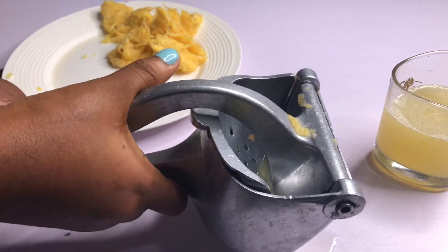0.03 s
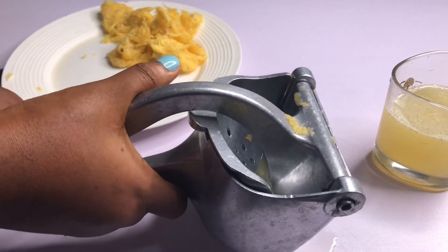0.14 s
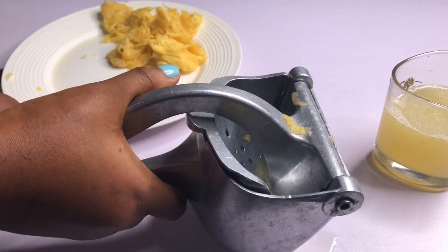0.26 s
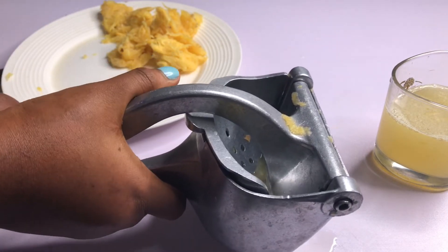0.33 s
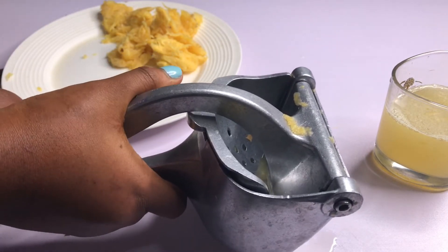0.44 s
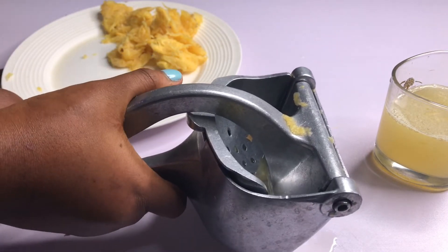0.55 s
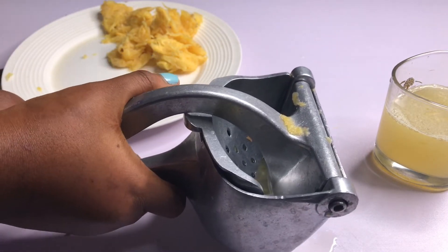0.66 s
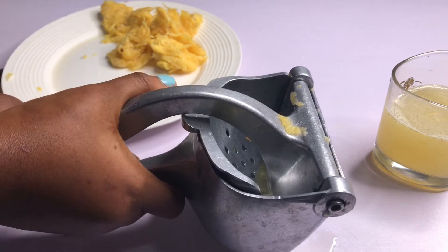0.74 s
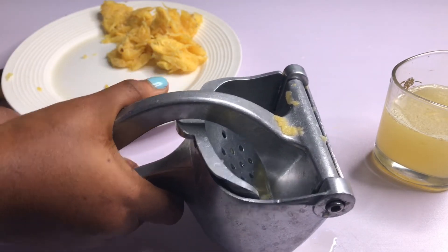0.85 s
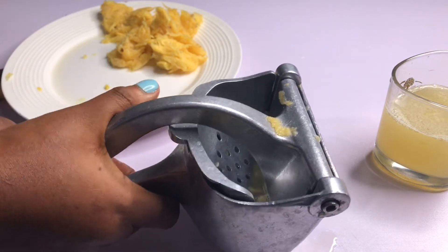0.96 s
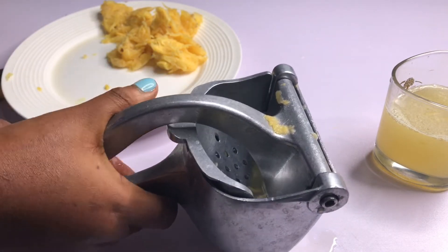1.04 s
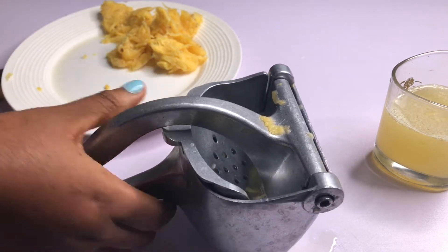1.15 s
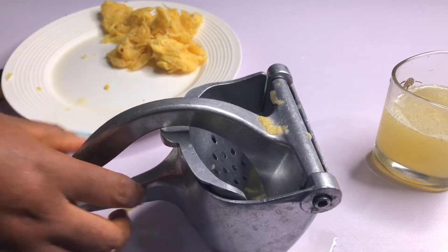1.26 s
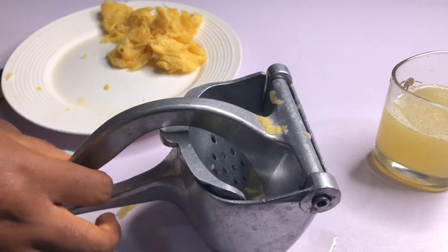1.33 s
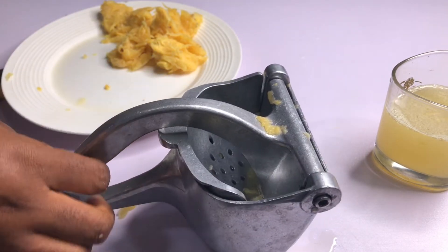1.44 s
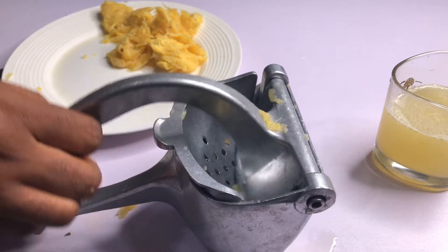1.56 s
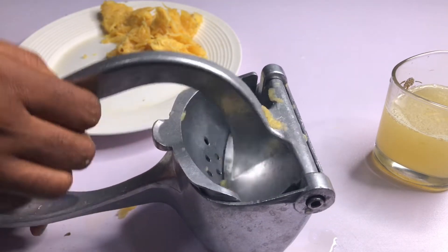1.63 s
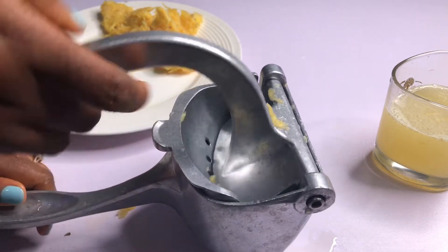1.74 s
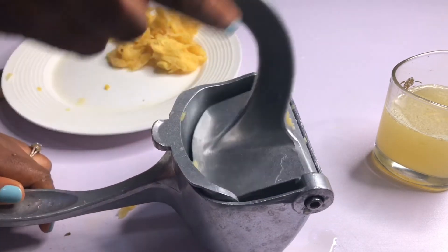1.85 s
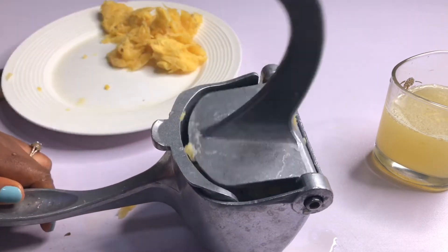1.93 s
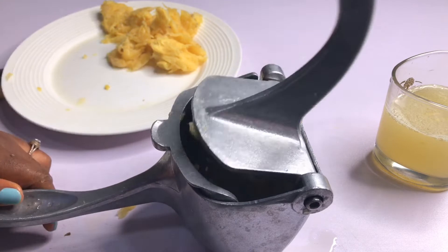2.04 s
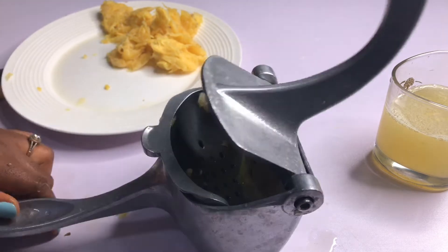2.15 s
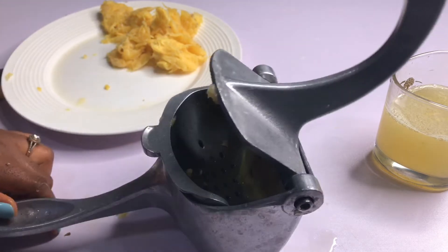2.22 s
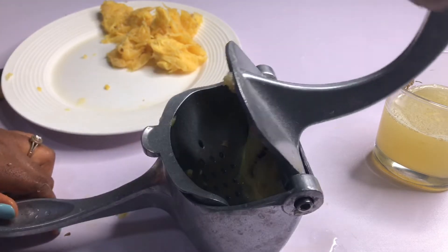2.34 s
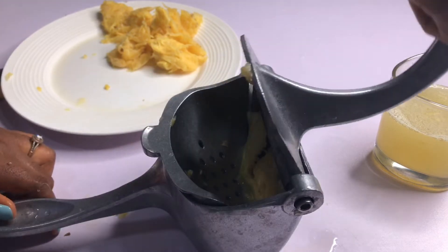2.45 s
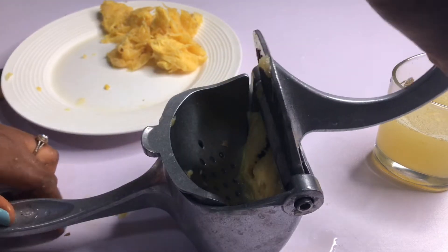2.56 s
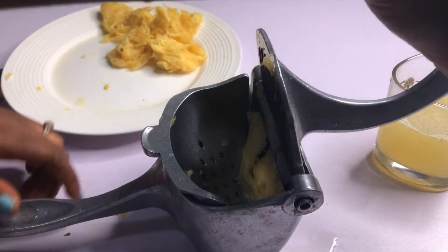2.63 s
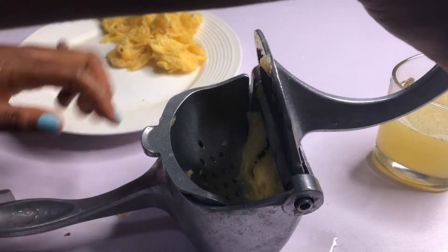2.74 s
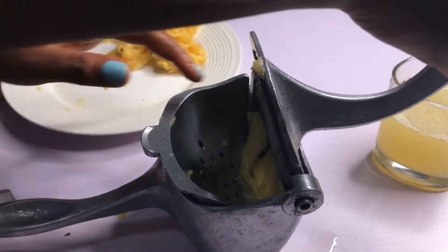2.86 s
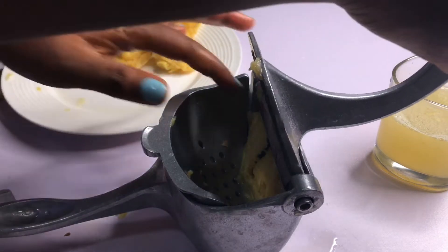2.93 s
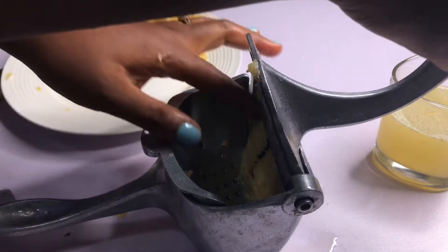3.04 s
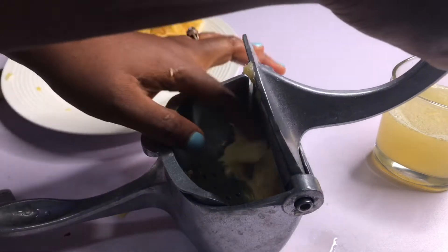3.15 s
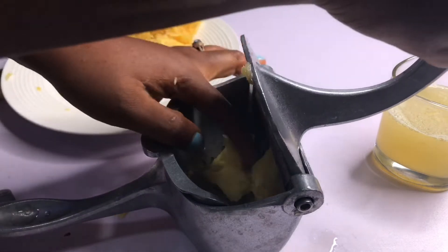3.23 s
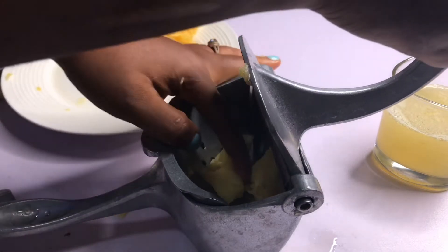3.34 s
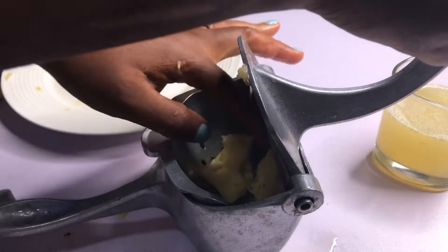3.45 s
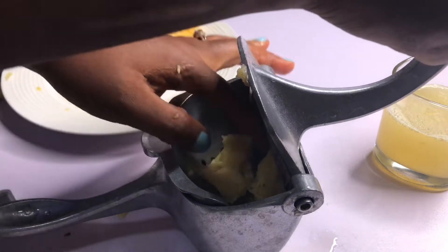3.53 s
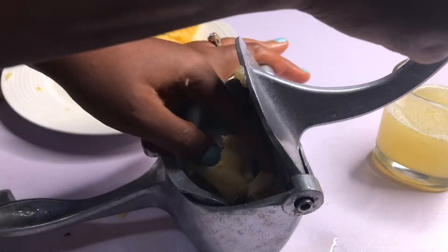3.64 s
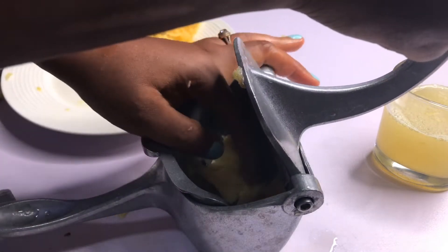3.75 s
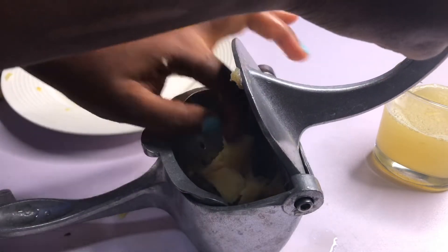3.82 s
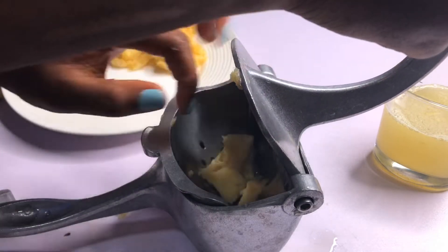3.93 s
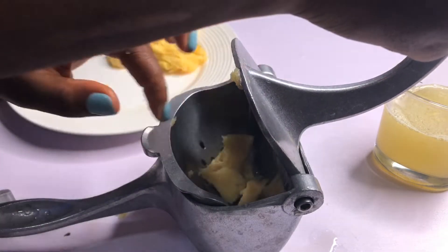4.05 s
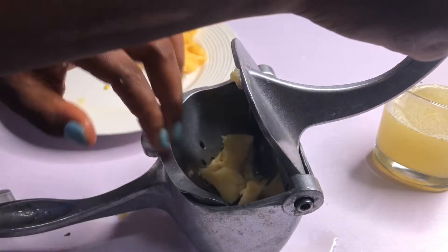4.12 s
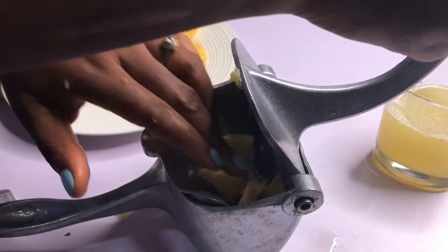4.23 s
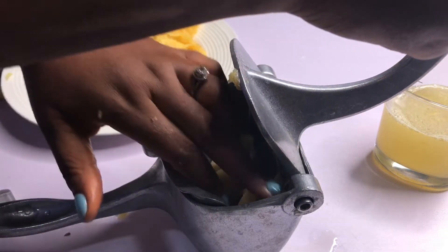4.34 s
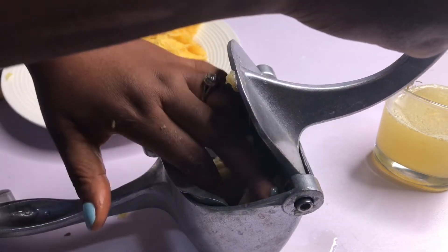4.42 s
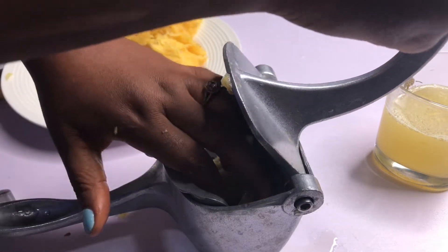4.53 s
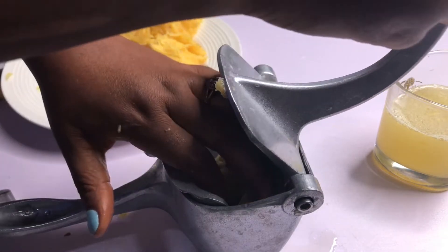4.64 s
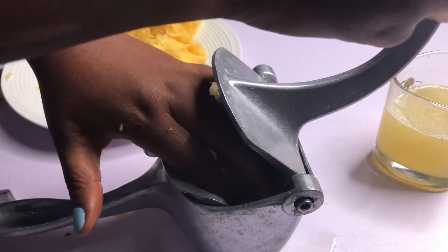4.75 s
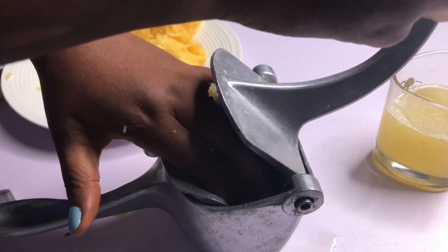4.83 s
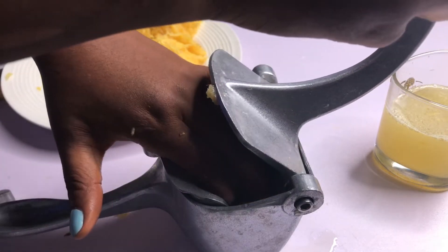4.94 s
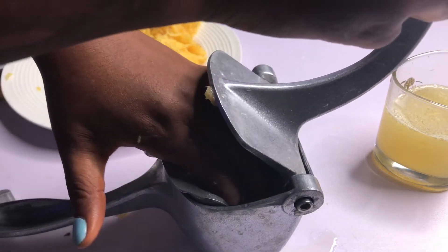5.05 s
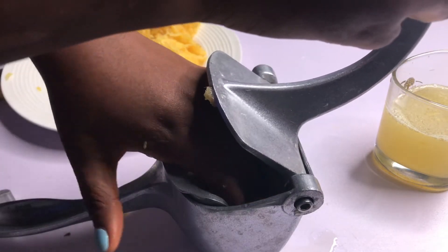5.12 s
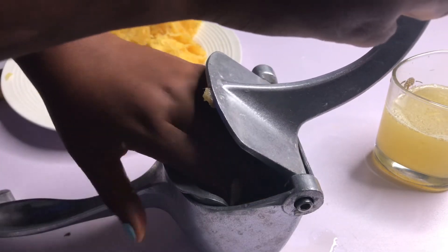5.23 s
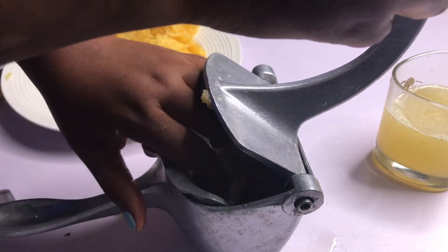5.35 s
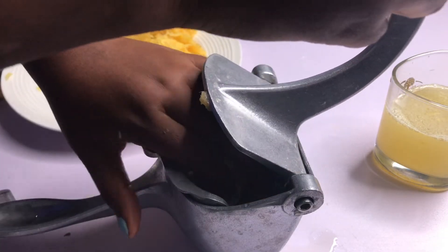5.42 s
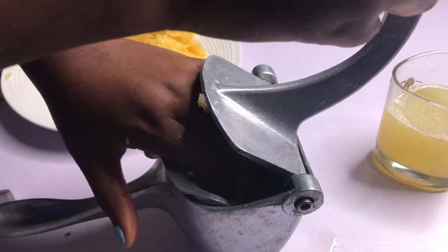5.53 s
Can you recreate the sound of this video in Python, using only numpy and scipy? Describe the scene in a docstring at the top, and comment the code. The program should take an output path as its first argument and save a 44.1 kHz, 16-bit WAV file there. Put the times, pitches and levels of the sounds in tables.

```python
"""A cast-metal lever juicer is worked on a kitchen table, close to the microphone.
The lever falls open with a loud clack and the foot knocks: each blow rings damped tones in frame, cup and table.
The loose hinge judders in short bursts of tiny slips as the lever lifts.
Juice squirts, wet peel clicks, fingers rub and pulp fizzes (gritty noise); a finger ring scrapes and squeaks on the cup.
A small room echoes everything softly, over quiet air noise and a faint hum of steady tones."""
import sys
import numpy as np
from scipy import signal
from scipy.fft import rfft, irfft
from scipy.io import wavfile

SR = 44100
rng = np.random.default_rng(int(sys.argv[2]) if len(sys.argv) > 2 else 0)


def file_out(sig):
    """Save sig as 16-bit WAV at sys.argv[1]."""
    # one column per channel
    cols = np.atleast_2d(sig).T
    # limit, then scale
    lim = np.clip(cols, -1, 1)
    pcm = np.round(lim * 32767).astype(np.int16)
    wavfile.write(sys.argv[1], SR, pcm)


N = 246078
T = np.arange(N) / SR
RING_T = T[:int(.8 * SR)]
SHORT_T = RING_T[:len(RING_T) // 10]
BLOW_SIZE = np.sqrt(.01 * SR)  # a blow's level is its energy spread over 10 ms


# the lever falls against its stop; hardness is the treble limit of a contact
CLACK_S, CLACK_HARD_HZ, CLACK_CHATTER_S = 2.137, 11800, .0083
CLACK_FRAME_DB, CLACK_TABLE_DB, CLACK_CUP_DB = -8.5, -13.5, -22.5
# steps from one contact to the next: time, levels, and factors on hardness and chatter length
REBOUND_S, REBOUND_DB, REBOUND_TABLE_DB = .0082, -3, -16.5
REBOUND_SOFTER, REBOUND_LOOSER = 0.56, 1.5


def clack(count=3):
    """The lever hits its stop and rebounds; each contact is weaker, softer and looser than the last."""
    contacts = []
    for k in range(count):
        contacts.append((
            CLACK_S + k * REBOUND_S,
            CLACK_HARD_HZ * REBOUND_SOFTER ** k,
            CLACK_FRAME_DB + k * REBOUND_DB,
            CLACK_TABLE_DB + k * REBOUND_TABLE_DB,
            CLACK_CUP_DB + k * REBOUND_DB,
            CLACK_CHATTER_S * REBOUND_LOOSER ** k))
    return blows(contacts, chatter_db=2.5, dense_db=-1, ring_db=-10, room_db=-5, foot_share=0.76, rock_db=-20)


# knocks of foot and fingers on the juicer; the table level is that of the push before it is softened
# columns: start_s, hardness_hz, frame_db, table_db, cup_db
KNOCKS = [(1.0409, 820, -17, -18.5, -58), (2.115, 3530, -51, -51, -70), (2.5137, 2720, -44, -47, -66),
          (2.8031, 1398, -56.5, -53, -74.5), (2.9706, 3000, -35, -39, -54),
          (3.117, 1800, -48.5, -45.5, -57), (3.2135, 2464, -50.5, -51.5, -66),
          (3.5768, 2166, -52.5, -50.5, -75), (3.8069, 870, -51, -49.5, -81),
          (3.9178, 990, -57.5, -45, -61.5), (3.947, 1198, -47, -44.5, -54), (4.3125, 724, -43, -38, -42.5),
          (5.0496, 3300, -49.5, -48, -52.5), (5.3147, 3000, -50, -48, -58), (5.3545, 2520, -57, -48, -62),
          (5.474, 6040, -45.5, -43.5, -39)]
KNOCK_CHATTER_S = 0.0051
# the first touch: how much earlier, level relative to the frame, fade time
TICK_LEAD_S, TICK_DB, TICK_S = 0.0016, -20.5, .0006


def knocks(tick_hz=11000):
    """A bright tick of noise at first touch, then the blow itself."""
    ticks = np.zeros(N)
    for start_s, _, frame_db, _, _ in KNOCKS:
        tick = unit(grit(len(RING_T), 3) * np.exp(-RING_T / TICK_S))
        add(ticks, start_s - TICK_LEAD_S, BLOW_SIZE * undb(frame_db + TICK_DB) * tick)
    ticks = through(soften(ticks, tick_hz), colour(CASTING_COLOUR))
    contacts = [(*knock, KNOCK_CHATTER_S) for knock in KNOCKS]
    body = blows(contacts, chatter_db=3.5, dense_db=0, ring_db=-11.5, room_db=-6.0, foot_share=1.1, rock_db=-7.5)
    return body + kitchen(ticks, wet_db=-8)


# ringing tones of the table, the cast frame and the strainer cup, levels relative within each table
# columns: pitch_hz, level_db, decay_s (time to fall by 60 dB)
TABLE_TONES = [(91.5, 2.5, 0.32), (112.5, -2.5, 0.21), (124, -6.5, 0.041), (183, 1, 0.53), (199.5, -4, .26),
               (218.5, -9, .26), (293.6, 4, 0.33), (329, -0.5, 0.17), (434, -6.5, .26), (425, -5, 0.28),
               (510, -16.5, 0.27), (588, 0, 0.28), (632.6, -10, 0.67), (733, -2, .26), (797, -10, 0.075),
               (918, -6.5, .17)]
FRAME_TONES = [(842, 4, .33), (950, -2, .35), (1042, -4, .24), (1152, -5, .2), (1427, -2, .18),
               (1504, -2, .18), (1663, -5, .2), (1773, -3, .18), (1858, 2, .18), (2028, -3, .24),
               (2500, -6, .22), (2670, -2, .12), (2826, -6, .3), (3505, -5, .16), (3960, 0, .13)]
CUP_TONES = [(1300, -7, .06), (1380, -6, .06), (2500, -13, .25), (2970, -8, .06), (4400, -7, .06),
             (4465, -13, .18), (5350, 2, .1), (5385, -8, .26), (6670, -7, .09), (6745, -12, .3),
             (10780, -22, .18), (11600, -20, .12)]
# tone colour of the casting when struck; columns: pitch_hz, relative level_db
CASTING_COLOUR = [(60, -23), (150, -0.5), (300, 0.5), (480, -2.5), (700, 1), (1300, 0.5), (2000, -1),
                  (4000, -4.5), (5000, -9), (8000, -11.5), (11000, -18.5), (16000, -14)]
# the juicer rocks: its second foot meets the table this much later
ROCK_S = .0022


def blows(contacts, chatter_db, dense_db, ring_db, room_db, foot_share, rock_db,
          dense_t60=.081, room_build_s=0.0037, lowest_hz=60):
    """Each blow chatters briefly in the loose joints, rings frame, cup and table, and echoes in the kitchen."""
    out, table = np.zeros((2, N))
    t = RING_T
    casting, frame, cup = colour(CASTING_COLOUR), modes(FRAME_TONES), modes(CUP_TONES)
    push = 1. * (t == 0)
    for start_s, hard_hz, frame_db, table_db, cup_db, chatter_s in contacts:
        chatter = undb(chatter_db) * unit(grit(len(t), 2.5) * np.exp(-t / chatter_s))
        # the casting's many short modes blur into a noisy crash
        dense_fade = np.exp(-np.log(1000) * t / dense_t60)
        dense = undb(dense_db) * unit(rng.standard_normal(len(t)) * dense_fade)
        room = undb(room_db) * tail(KITCHEN_DECAY, room_build_s)
        crash = unit(through(push + chatter + dense + room, casting))
        crash = crash + undb(ring_db) * frame
        add(out, start_s, undb(frame_db) * unit(soften(crash, hard_hz)))
        # a softer contact reaches only the cup's lower modes
        cup_ring = soften(soften(cup, 1.4 * hard_hz), 1.4 * hard_hz)
        add(out, start_s, undb(cup_db) * unit(cup_ring))
        foot = undb(table_db) * soften(push, foot_share * hard_hz)
        add(table, start_s, foot)
        add(table, start_s + ROCK_S, undb(rock_db) * foot)
    # the table top gives off little deep bass
    bass_cut = signal.butter(3, lowest_hz, "highpass", fs=SR, output="sos")
    thud = signal.sosfilt(bass_cut, through(table, modes(TABLE_TONES)))
    return BLOW_SIZE * (out + thud)


# catches of the hinge, levels before the shares heard from pin, frame and table
# columns: peak time_s, level_db, rise_s (from start to peak), hardness_hz
CATCHES = [(1.473, -42.5, 0.0051, 12000), (1.498, -26, 0.0016, 4675), (1.537, -27.5, 0.0032, 2505),
           (1.585, -26.5, 0.0016, 2476), (1.5897, -35.5, 0.0012, 12990), (1.6472, -30, 0.0036, 3342),
           (1.7231, -27.5, 0.0031, 5000), (1.7696, -41.5, .0019, 5480), (1.841, -48, 0.0029, 1940)]
# turns of the lever on its dry pin, same kind of level; columns: start_s, length_s, level_db
TURNS = [(1.468, .29, -50), (2.002, 0.16, -64.5)]
# tone colour of the pin; columns: pitch_hz, relative level_db
HINGE_COLOUR = [(60, -23), (100, -4), (320, -6), (470, -11), (900, -1.5), (1400, 3), (1900, 0.5),
                (2300, -7), (3300, -5.5), (4700, -12.5), (7000, -11), (16000, -17.5)]
# the pin creeps just before it lets go: how much earlier, relative level
CREEP_LEAD_S, CREEP_DB = .006, -10
TURN_ATTACK_S, TURN_RELEASE_S = 0.011, .055


def hinge(slip_db=-.5, ring_db=-19.5, table_db=-19):
    """The dry pin drags and lets go in short bursts of slips that shake the frame and table."""
    force, pin = np.zeros(N), colour(HINGE_COLOUR)
    creeps = [(peak_s - CREEP_LEAD_S, db + CREEP_DB, rise_s, hard_hz) for peak_s, db, rise_s, hard_hz in CATCHES]
    for peak_s, db, rise_s, hard_hz in CATCHES + creeps:
        swell_and_fade = SHORT_T / rise_s * np.exp(-SHORT_T / rise_s)
        slips = grit(len(SHORT_T), 3) * swell_and_fade
        burst = unit(through(soften(slips, hard_hz), pin))
        add(force, peak_s - rise_s, BLOW_SIZE * undb(db) * burst)
    drag = sum(undb(db) * stroke(start_s, length_s, TURN_ATTACK_S, TURN_RELEASE_S)
               for start_s, length_s, db in TURNS)
    force += drag * through(soften(grit(N, 2.6), 4000), pin)
    body = undb(ring_db) * modes(FRAME_TONES) + undb(table_db) * modes(TABLE_TONES)
    return undb(slip_db) * force + through(force, body)


# juice squirts (the first three rows) and wet clicks
# columns: start_s, level_db, pitch_hz (within the noise band), fade_s
SQUIRTS_AND_CLICKS = [(0.159, -66.5, 5960, .012), (0.314, -63, 5500, 0.017), (0.544, -61.5, 5430, 0.049),
                      (3.076, -68, 11000, 0.0019), (3.4423, -49, 4000, 0.0021), (4.757, -62, 7000, .0036),
                      (4.967, -65.5, 9070, .003), (5.027, -54.5, 3220, 0.0051), (5.451, -48, 9880, 0.0021)]


def squirts_and_clicks(width_octaves=0.86):
    """Juice squirts and wet peel clicks: short bursts of gritty noise in one band."""
    out = np.zeros(N)
    for start_s, db, pitch_hz, fade_s in SQUIRTS_AND_CLICKS:
        low_hz = pitch_hz / 2 ** width_octaves
        high_hz = min(pitch_hz * 2 ** (width_octaves / 2), .45 * SR)
        band = signal.butter(1, [low_hz, high_hz], "bandpass", fs=SR, output="sos")
        burst = signal.sosfilt(band, grit(len(SHORT_T), 5.3) * np.exp(-SHORT_T / fade_s))
        add(out, start_s, BLOW_SIZE * undb(db) * unit(burst))
    return out


# fingers rubbing on peel and metal, levels before wavering; columns: start_s, length_s, level_db
RUBS = [(0.114, 0.11, -61.5), (3.02, .22, -63), (3.527, 0.076, -58), (3.896, 0.045, -64),
        (4.319, 0.044, -62.5), (4.826, .17, -71), (5.03, 0.31, -61.5), (5.425, 0.069, -51.5)]
# tone colour of rubbing skin; columns: pitch_hz, relative level_db
SKIN_COLOUR = [(80, 8.5), (200, 6.5), (500, 2), (1000, 4.5), (2500, -11), (6000, -11.5), (10000, -31.5),
               (16000, -17)]
RUB_ATTACK_S, RUB_RELEASE_S = 0.012, 0.05
# tiny wet ticks scattered through every rub: average rate, level relative to the rub, treble above
WET_PER_S, WET_DB, WET_HZ = 35, -11, 3000


def rubs(wet_s=0.0025, table_db=-9):
    """Rubbing fingers make uneven grit that shakes the table, with wet ticks at random moments."""
    effort = sum(undb(db) * stroke(start_s, length_s, RUB_ATTACK_S, RUB_RELEASE_S)
                 for start_s, length_s, db in RUBS)
    rub = effort * undb(3 * wander(count=60)) * grit(N, 7)
    chosen = rng.random(N) < WET_PER_S / SR
    tick_starts = effort * chosen * rng.standard_normal(N) * np.sqrt(SR / WET_PER_S)
    bass_cut = signal.butter(1, WET_HZ, "highpass", fs=SR, output="sos")
    tick = signal.sosfilt(bass_cut, rng.standard_normal(len(SHORT_T)) * np.exp(-SHORT_T / wet_s))
    wet = undb(WET_DB) * through(tick_starts, unit(tick))
    return through(rub, colour(SKIN_COLOUR)) + undb(table_db) * through(rub, modes(TABLE_TONES)) + wet


# tone colour of the squeezed pulp; columns: pitch_hz, relative level_db
PULP_COLOUR = [(300, 4.5), (1200, -16.5), (1900, 2), (2600, -14), (3300, -5.5), (4000, -29), (12000, -38)]
FIZZ_DB, FIZZ_FADE_S = -50, 0.066


def fizz():
    """The pulp fizzes out as the pressure is let off: gritty noise fading from the very start."""
    hiss = undb(FIZZ_DB) * np.exp(-T / FIZZ_FADE_S) * grit(N, 3.3)
    return through(hiss, colour(PULP_COLOUR))


# slides of the finger ring over the cup, levels before the swell, wavering and shares below
# columns: start_s, length_s, scrape_db, squeak_db
SLIDES = [(5.0472, 0.0088, -46.5, -36), (5.1825, .058, -46, -44), (5.501, 0.0031, -48.5, -38)]
# tone colours of the ring's touch on the cup and of its rasp; columns: pitch_hz, relative level_db
RING_CONTACT_COLOUR = [(300, -51.5), (1300, 4), (3000, -4), (4460, 15), (5375, -7), (6700, -7), (8000, -23),
                       (12000, -17)]
RING_RASP_COLOUR = [(200, -29), (650, 13), (1400, 7.5), (1900, 1), (3000, 18), (4400, 4.5), (5500, -4),
                    (6900, 23), (8000, -38), (9300, -8), (16000, -20)]
# the ring bites at once and presses harder as it goes
SLIDE_ATTACK_S, SLIDE_RELEASE_S, SLIDE_SWELL_DB_PER_S = 0.0014, 0.015, 125


def scrape(cup_db=-7, rasp_db=-2.5):
    """The ring rasps over the cup in uneven slips that keep its modes ringing."""
    pressure = sum(undb(db) * stroke(start_s, length_s, SLIDE_ATTACK_S, SLIDE_RELEASE_S, SLIDE_SWELL_DB_PER_S)
                   for start_s, length_s, db, _ in SLIDES)
    slips = pressure * undb(4.5 * wander(count=300)) * grit(N, 6)
    cup = through(through(slips, colour(RING_CONTACT_COLOUR)), modes(CUP_TONES))
    return undb(cup_db) * cup + undb(rasp_db) * through(slips, colour(RING_RASP_COLOUR))


def squeaks(pitch_hz=6775, stop_s=0.0036, waver_hz=70, rough_db=3):
    """Stick and slip lock onto a high mode of the cup; the wavering tone dies when the ring lets go."""
    level = sum(undb(db) * stroke(start_s, length_s, SLIDE_ATTACK_S, stop_s, SLIDE_SWELL_DB_PER_S)
                for start_s, length_s, _, db in SLIDES)
    phase = 2 * np.pi * np.cumsum(pitch_hz + waver_hz * wander(count=700)) / SR
    return level * undb(rough_db * wander(count=500)) * np.sqrt(2) * np.sin(phase)


# how long the kitchen echoes; columns: pitch_hz, decay_s (time to fall by 60 dB)
KITCHEN_DECAY = [(100, 0.57), (400, 0.59), (1000, 0.54), (3000, 0.49), (5500, 0.39), (14000, .23)]


def kitchen(x, wet_db, build_s=.004):
    """Reflections from near walls build up quickly, then die away, the treble soonest."""
    return x + undb(wet_db) * through(x, tail(KITCHEN_DECAY, build_s))


# tone colour of the room air; columns: pitch_hz, relative level_db
AIR_COLOUR = [(15, -48.5), (25, -20.5), (87, -10.5), (149, -10), (200, -19), (236, -6), (263, -18),
              (335, -16), (489, -36), (575, -23.5), (887, -30), (962, -29.5), (1440, -31.5), (1610, -35),
              (16000, -47.5)]
AIR_DB = -59.5
# steady hum, levels before wavering; columns: pitch_hz, level_db
HUM = [(80.7, -72), (140, -70.5), (236.7, -62.5), (710.6, -80.5)]


def background(waver_db=3.5):
    """Quiet room air (coloured noise) and the slightly wavering hum of an appliance (steady sines)."""
    air = undb(AIR_DB) * through(rng.standard_normal(N), colour(AIR_COLOUR, size=8192))
    hum = sum(np.sqrt(2) * undb(db) * np.sin(2 * np.pi * (pitch_hz * T + rng.random()))
              for pitch_hz, db in HUM)
    return air + undb(waver_db * wander(count=5)) * hum


def undb(db):
    """Decibels to gain."""
    return 10 ** (np.asarray(db) / 20)


def unit(x):
    """Scale to an energy of one."""
    return x / np.sqrt(np.sum(x ** 2))


def at_hz(points, hz):
    """Read (pitch_hz, value) points on a log-frequency axis."""
    f, value = np.transpose(points)
    return np.interp(np.log(np.maximum(hz, 1)), np.log(f), value)


def through(x, response):
    """Pass a sound through an impulse response."""
    return signal.fftconvolve(x, response)[:len(x)]


def colour(points, size=2048):
    """Response of unit energy with the given spectrum, its energy as early as possible (minimum phase)."""
    log_gain = np.log(undb(at_hz(points, np.fft.rfftfreq(size, 1 / SR))))
    cepstrum = irfft(log_gain)
    # folding the second half onto the first leaves nothing before the start
    cepstrum[1:size // 2] *= 2
    cepstrum[size // 2 + 1:] = 0
    return unit(irfft(np.exp(rfft(cepstrum))))


def modes(table):
    """Ring of damped sines; neighbouring modes move in opposite senses."""
    ring = np.zeros(len(RING_T))
    for k, (pitch_hz, db, t60) in enumerate(table):
        level = undb(db - 60 * RING_T / t60)
        ring += (-1) ** k * level * np.sin(2 * np.pi * pitch_hz * RING_T)
    return unit(ring)


def tail(decays, build_s, count=10):
    """Diffuse ring: noise whose bands each die at their own rate."""
    hz, centres = np.fft.rfftfreq(len(RING_T), 1 / SR), np.geomspace(80, 16000, count)
    # overlapping bands that add up to the whole spectrum
    shares = np.array([at_hz(np.c_[centres, row], hz) for row in np.eye(count)])
    bands = irfft(rfft(rng.standard_normal(len(RING_T))) * shares, len(RING_T))
    fades = np.exp(-np.log(1000) * RING_T / at_hz(decays, centres)[:, None])
    build = 1 - np.exp(-RING_T / build_s)
    return unit(np.sum(bands * fades, axis=0) * build)


def soften(x, hz):
    """A softer contact pushes for longer and loses its treble."""
    return signal.sosfilt(signal.butter(2, min(hz, .45 * SR), fs=SR, output="sos"), x)


def grit(size, spread_db):
    """Dense tiny slips of unequal strength, rms one."""
    strength = undb(spread_db * np.clip(rng.standard_normal(size), -2, 2))
    slips = rng.standard_normal(size) * strength
    return slips / np.std(slips)


def add(track, start_s, sound):
    """Mix a sound into a track at the given time."""
    start = max(int(start_s * SR), 0)
    track[start:start + len(sound)] += sound[:N - start]


def wander(count):
    """Random levels joined by straight lines, count of them a second."""
    knots = np.arange(0, T[-1] + 1, 1 / count)
    return np.interp(T, knots, np.clip(rng.standard_normal(len(knots)), -2, 2))


def stroke(start_s, length_s, attack_s, release_s, swell_db_per_s=0):
    """Gain of one movement: it rises, holds or swells for its length, then dies away."""
    age = np.maximum(T - start_s, 0)
    held = np.minimum(age, length_s)
    rise = np.minimum(age / attack_s, 1)
    return rise * undb(swell_db_per_s * held) * np.exp(-(age - held) / release_s)


def scene():
    """The juicer and the fruit in the room, over its hum; sounds from inside the cup reach the walls less."""
    inside = squirts_and_clicks() + rubs() + fizz() + scrape() + squeaks()
    juicer = clack() + knocks() + kitchen(hinge(), wet_db=-11)
    return (juicer + kitchen(inside, wet_db=-14.5) + background())[None]


def record(dry):
    """The recorder rounds off the loudest peaks and cuts the deepest bass and the top."""
    bass_cut = signal.butter(2, 38, "highpass", fs=SR, output="sos")
    top_cut = signal.ellip(10, .2, 90, 16100, fs=SR, output="sos")
    return signal.sosfilt(top_cut, signal.sosfilt(bass_cut, np.tanh(dry)))


dry = scene()
out = record(dry)
file_out(out)
```